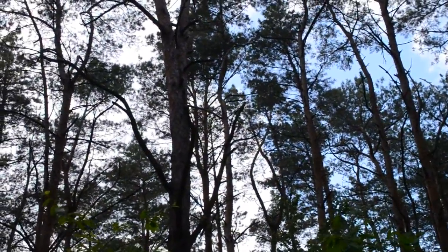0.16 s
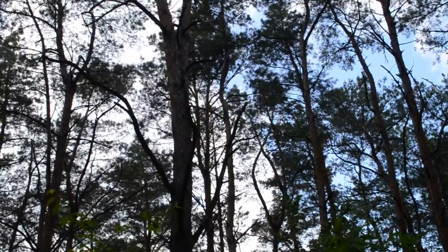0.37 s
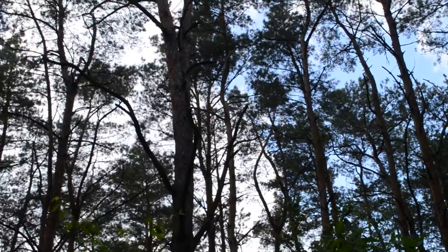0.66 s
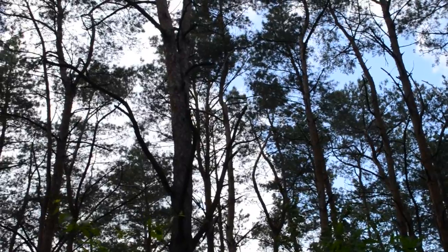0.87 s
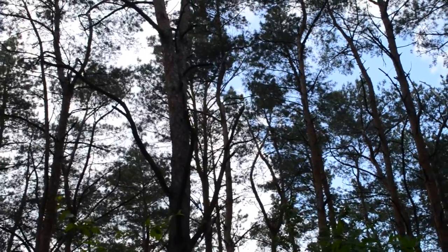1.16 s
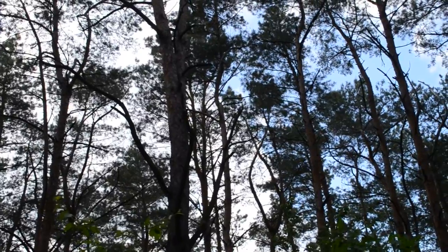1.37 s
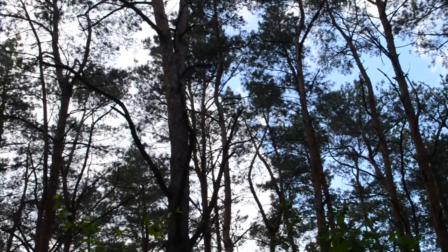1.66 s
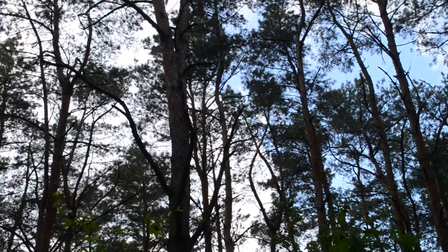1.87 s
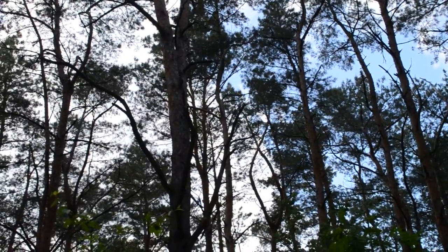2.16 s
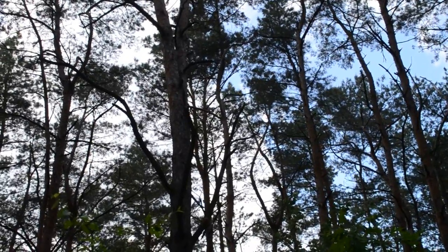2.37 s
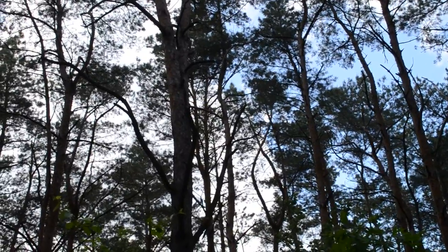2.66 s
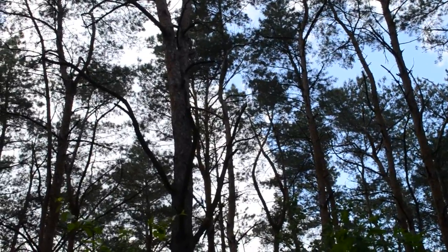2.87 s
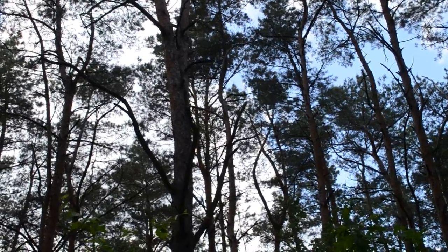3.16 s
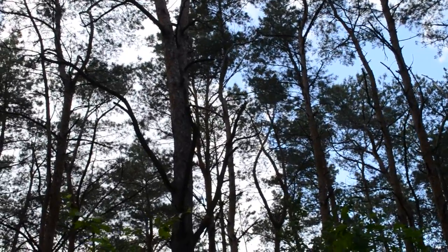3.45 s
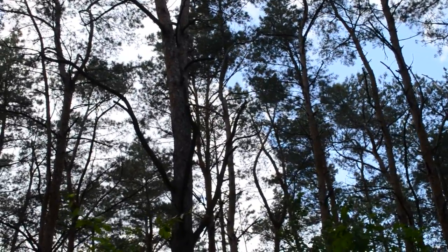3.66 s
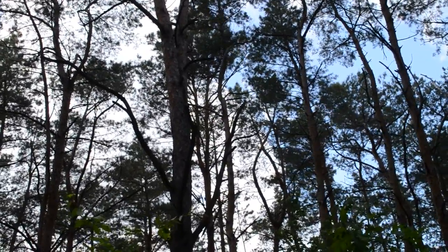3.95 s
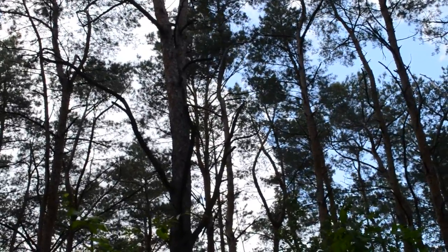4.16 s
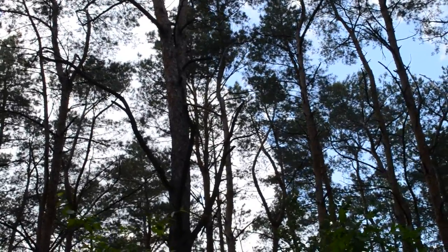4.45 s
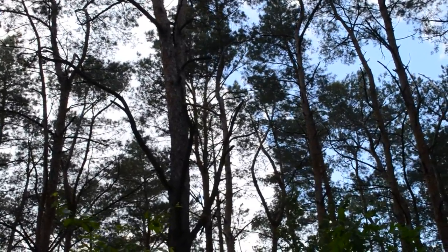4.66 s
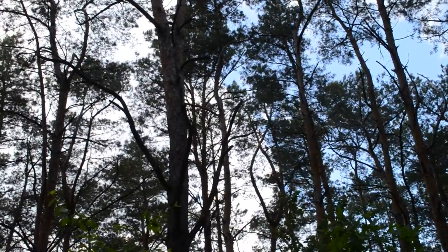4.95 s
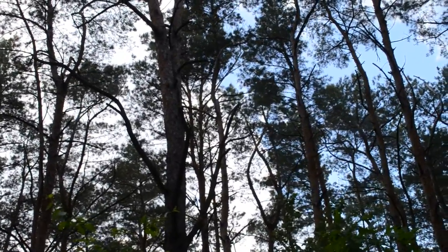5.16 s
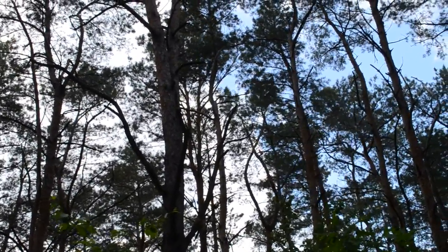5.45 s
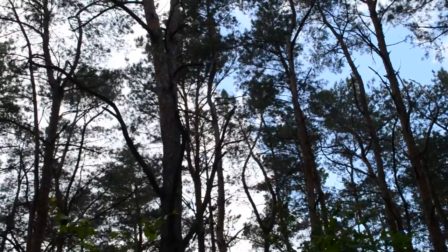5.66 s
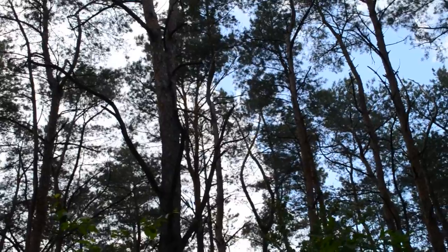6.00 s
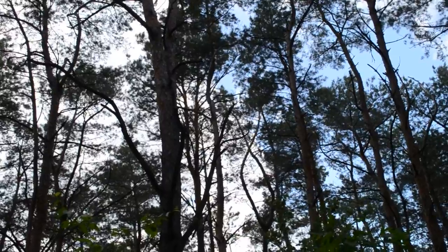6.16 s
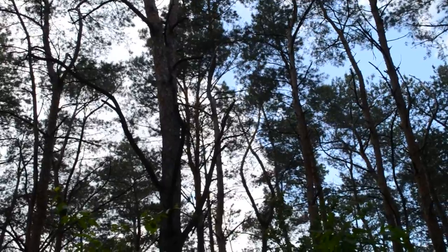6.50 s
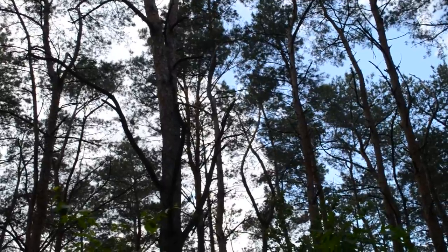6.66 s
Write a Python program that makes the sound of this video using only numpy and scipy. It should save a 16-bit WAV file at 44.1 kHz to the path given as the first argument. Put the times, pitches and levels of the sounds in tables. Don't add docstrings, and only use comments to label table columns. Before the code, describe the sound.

A calm pine forest, captured in mono outdoors. Throughout lies a quiet, soft hiss of wind in the crowns and distant traffic, swelling slightly after 2 s, with an almost inaudible thin band of far insects. From about 1 to 5 s, faint birds peep far off, some high, mostly lower and mellow. At 3.4 s a close warbler begins: thin, bright, very short chirps sweeping steeply upward, first softer and about 0.2 s apart, then louder and closer, eleven in all until 4.9 s. At 5.0 s they turn into a fast, even trill, about sixteen notes a second, softening slightly before ending near 6.4 s. A small dry twig snap ticks at 5.0 s. From 5.7 to 6.7 s a more distant thrush gives lower, clear sliding whistles and a brief fast warble. Trunks lend a short, airy echo; the quiet hush remains until 6.8 s.

```python
import sys
import numpy as np
from scipy import signal
from scipy.fft import rfft, irfft, next_fast_len
from scipy.io import wavfile
from scipy.ndimage import uniform_filter1d

SR = 44100
rng = np.random.default_rng(int(sys.argv[2]) if len(sys.argv) > 2 else 0)


def linear_from_db(decibels):
    return 10 ** (np.asarray(decibels, float) / 20)


def pcm_store(signal):
    levels = np.round(np.clip(np.atleast_2d(signal), -1, 1) * 32767)
    wavfile.write(sys.argv[1], SR, levels.astype(np.int16).T)


N = 301203
KNEE_HZ = 5500


def at_hz(points, hz, column=1):
    table = np.array(points)
    return np.interp(np.log(hz), np.log(table[:, 0]), table[:, column])


def rms_one(x):
    return x / np.sqrt(np.mean(x ** 2) + 1e-20)


def drift(rate):
    r = np.exp(-80 * np.pi * rate / SR)
    slow = signal.lfilter([1], [1, -2 * r, r * r], rng.standard_normal(N // 40 + 2002))[2000:]
    return np.interp(np.arange(N) / 40, np.arange(len(slow)), rms_one(slow))


def add(out, rows, overtones=None, throat_db=0, round_s=0.0028):
    s, hz, db = np.array(sorted(rows)).T
    at = np.arange(int(s[0] * SR), min(int(s[-1] * SR), N))
    size = max(int(round_s * SR), 1)
    pitch = uniform_filter1d(np.interp(at / SR, s, hz), size, mode="nearest")
    level = uniform_filter1d(np.interp(at / SR, s, db), size, mode="nearest")
    phase = 2 * np.pi * np.cumsum(pitch) / SR
    wave = np.sin(phase)
    if overtones:
        second = linear_from_db(throat_db + at_hz(overtones, pitch))
        third = linear_from_db(throat_db + at_hz(overtones, pitch, column=2))
        wave += second * np.sin(2 * phase)
        wave += third * np.sin(3 * phase) * (3 * pitch < .45 * SR)
    fade = np.clip(np.minimum(at - at[0], at[-1] - at) / size, 0, 1)
    out[at] += linear_from_db(level) * fade * wave


def shifted(shape, s, hz_scale, db, stretch=1, depth=1):
    return [(s + stretch * ms / 1000, hz_scale * hz, db + depth * under) for ms, hz, under in shape]


def climb(shape, s, ms, top_hz, db, early_db):
    return [(s + at * ms / 1000, KNEE_HZ + up * (top_hz - KNEE_HZ), db + under + early_db * (1 - at))
            for at, up, under in shape]


# time in ms, share of the climb, level in dB under the peak.
CHIRP_BEND = [(0.0, 0.0, -3.5), (3, .24, -4.5), (8, 0.51, -1)]
# share of the time left, level in dB under the peak.
CHIRP_CLIMB = [(.3, 2.5), (.7, .5), (1.0, -3)]


def bent(ms):
    bend_ms, bend, _ = CHIRP_BEND[-1]
    start = [(at / ms, up, db) for at, up, db in CHIRP_BEND]
    rest = [((bend_ms + at * (ms - bend_ms)) / ms, bend + at * (1 - bend), db) for at, db in CHIRP_CLIMB]
    return start + rest


# time in ms, share of the start pitch, level in dB.
FLICK = [(-2, 1.005, -25), (0, 1, -3), (2, .975, 0), (5.5, .88, -4), (8.5, .8, -14), (18, .5, -18),
         (20, .45, -40)]


def flick(out, s, ms, top_hz):
    db = -48.5 - 3.5 * max(30.3 - ms, 0)
    start_hz = 3530 + .75 * top_hz
    add(out, shifted(FLICK, s + .0315, start_hz, db), round_s=.0015)


# time of the knee in seconds, ms to the top, top in Hz, peak in dB.
CHIRPS = [(3.432, 30, 9020, -35.5), (3.6246, 28.4, 8540, -36), (3.787, 29.6, 8370, -35),
          (3.941, 29.7, 8060, -31), (4.0904, 29.8, 7900, -30), (4.235, 36.6, 7890, -32),
          (4.3762, 29.6, 7790, -30), (4.5076, 28, 7730, -30.5), (4.6397, 30, 7800, -28),
          (4.7729, 27.7, 7600, -26), (4.8862, 25, 7550, -27.5)]
# time in ms, share of the way from foot to knee, level in dB under the peak.
CHIRP_RUN_UP = [(-21, .02, -48), (-17, 0.031, -31), (-13, .14, -30.5), (-8, .3, -20), (-6.5, 0.52, -15),
                (-2, .64, -12), (-2, .78, -6)]
# time in ms, share of the top pitch, level in dB under the peak.
CHIRP_DROP = [(3.5, .99, -5.5), (7, .935, -13), (11, .87, -32)]
# pitch in Hz, second overtone in dB, third in dB.
OVERTONES = [(1900, 9, -30), (2200, 10, -25), (2700, 6, -20), (3270, -1, -17), (4200, -11, -34),
             (5070, -18, -52), (6230, -46, -64)]


def chirps(out):
    for s, ms, top_hz, db in CHIRPS:
        cold = np.exp((CHIRPS[0][0] - s) / .35)
        stretch, depth = 1 + cold * (0.44 - 1), 1 + cold * (0.28 - 1)
        foot_hz, early_db = 1950 + cold * (3010 - 1950), cold * -10.5
        lead = shifted(CHIRP_RUN_UP, s, KNEE_HZ - foot_hz, db + early_db, stretch, depth)
        run_up = [(t, foot_hz + hz, level) for t, hz, level in lead]
        body = climb(bent(ms), s, ms, top_hz, db, early_db)
        fall = shifted(CHIRP_DROP, s + ms / 1000, top_hz, db)
        add(out, run_up + body + fall, OVERTONES, 9.1 * (depth - 1))
        flick(out, s, ms, top_hz)


# time of the knee in seconds, ms to the top, top in Hz, peak in dB, run-up stretch.
TRILL = [(4.9655, 16, 7380, -28, .8), (5.0276, 14, 7450, -26.5, .9), (5.0875, 16, 7440, -26.5, 1.0),
         (5.1488, 16, 7330, -26, 0.78), (5.2099, 16, 7310, -25.5, .9), (5.2714, 16, 7340, -26.5, 1.0),
         (5.333, 13, 7460, -26, 1), (5.393, 16, 7500, -26.5, 1.05), (5.4561, 15.5, 7420, -26.5, 1.2),
         (5.5185, 15.5, 7240, -27, 1.7), (5.5802, 16, 7270, -28, 1.7), (5.6404, 18.7, 7160, -28.5, 1.4),
         (5.703, 19, 7330, -26, 1.2), (5.7669, 13, 7140, -26, 1.4), (5.8271, 15.5, 7290, -26.5, 1.2),
         (5.89, 14, 7290, -27, 1.5), (5.9534, 15, 7350, -27, 1.3), (6.016, 13, 7310, -26.5, 1.4),
         (6.0804, 14, 7350, -25.5, 1.3), (6.145, 14, 7270, -27.5, 1.4), (6.2112, 13, 7140, -29, 1.7),
         (6.2751, 13, 7190, -29.5, 1.7), (6.3393, 17, 7090, -29.5, 1.6)]
# time in ms, pitch in Hz, level in dB under the early peak.
TRILL_RUN_UP = [(-16, 3480, -39.5), (-12, 3800, -22), (-8, 4250, -9.5), (-5, 4650, -7), (-3, 5160, 0.5)]
# share of the time, share of the climb, level in dB under the peak.
TRILL_CLIMB = [(0.0, 0.0, -0.33), (.35, 0.47, -0.16), (.75, .83, 0.97), (1.0, 1.0, -1)]
FIRST_CLIMB = [(0.0, 0.13, -2.5), (.25, .43, 0.33), (.55, .68, 1.2), (1.0, 1.0, 1.2)]
# time in ms, share of the top pitch, level in dB under the late peak.
TRILL_DROP = [(2.5, 1, -4.5), (5, 0.92, -8), (8, .9, -8), (11, .85, -31)]
# pitch in Hz, second overtone in dB, third in dB.
TRILL_OVERTONES = [(3600, -21, -76), (4260, -22.5, -61.5), (4760, -30.5, -61), (5950, -59.5, -60)]


def trill(out):
    break_ms = -5
    for s, ms, top_hz, db, stretch in TRILL:
        tired = (s - TRILL[0][0]) / (TRILL[-1][0] - TRILL[0][0])
        depth = 1.27 + tired * (.8 - 1.27)
        early_db = -3 + tired * (4 - -3)
        late_peak_db = db - early_db / 2
        lead = [(at + (stretch - 1) * min(at - break_ms, 0), hz, under) for at, hz, under in TRILL_RUN_UP]
        run_up = shifted(lead, s, 0.99, db + early_db / 2, depth=depth if tired else 1.1)
        body = climb(TRILL_CLIMB if tired else FIRST_CLIMB, s, ms, top_hz, late_peak_db, early_db)
        fall = shifted(TRILL_DROP, s + ms / 1000, top_hz, late_peak_db)
        throat_db = 8 * (depth - 1) + rng.normal(0, 2.5)
        add(out, run_up + body + fall, TRILL_OVERTONES, throat_db)


def warbler():
    out = np.zeros(N)
    chirps(out)
    trill(out)
    return out * linear_from_db(0.5 + 0.96 * drift(160))


# start in seconds, peak in dB.
SNAP = [
    (5.0353, -42.5),
]
# pitch in Hz, level in dB, seconds to fade by 60 dB.
SNAP_MODES = [(1416, 1.5, .03), (1950, -2, .022), (2450, -4, .02), (2950, -1.5, .02), (3350, -3, .018)]


def twig():
    out, t = np.zeros(N), np.arange(2000) / SR
    for s, db in SNAP:
        ring = sum(linear_from_db(d - 60 * t / t60) * np.sin(2 * np.pi * hz * t) for hz, d, t60 in SNAP_MODES)
        start = int(s * SR)
        out[start:start + len(t)] += linear_from_db(db) * ring * (1 - np.exp(-t / 0.0015))
    return out


# pitch in Hz, seconds to fade by 60 dB, scatter level in dB.
FOREST = [(1500, 0.93, 4.5), (3000, 0.74, 5.5), (4580, 0.55, 5.5), (5900, 0.53, 4.5), (7710, 0.55, 2.7),
          (9090, 0.46, 4.5), (10500, 0.29, 0.2)]


def scatter(onset_s, near_db, stretch):
    t = np.arange(SR) / SR
    edges, tail = 1000 * 2 ** np.arange(0, 3.7, 1 / 3), 0
    echoes = rng.standard_normal(SR) * linear_from_db(3 * rng.standard_normal(SR))
    for low, high in zip(edges, edges[1:]):
        band = signal.sosfilt(signal.butter(2, [low, high], "band", fs=SR, output="sos"), echoes)
        middle_hz = np.sqrt(low * high)
        t60 = stretch * at_hz(FOREST, middle_hz)
        band = band * linear_from_db(at_hz(FOREST, middle_hz, column=2))
        tail = tail + band * (linear_from_db(-60 * t / t60) + linear_from_db(near_db - 60 * t / 0.11))
    tail = tail * (1 - np.exp(-t / onset_s))
    return tail / np.sqrt(np.sum(tail ** 2))


def forest(x, onset_s, near_db, stretch):
    aims = np.array([linear_from_db(6 * drift(2.5)) for _ in range(3)])
    aims = aims / np.sqrt(np.sum(aims ** 2, axis=0))
    return sum(signal.fftconvolve(x * aim, scatter(onset_s, near_db, stretch))[:N] for aim in aims)


# share of its length, share of the pitch change, level in dB under the peak.
SLIDE = [(0.0, 0.0, -6), (.4, .5, 0.0), (.8, .88, -1.5), (1.0, 1.0, -6)]


def slides(rows):
    return [[(s + at * length, hz + up * (end_hz - hz), db + under) for at, up, under in SLIDE]
            for s, length, hz, end_hz, db in rows]


def whistles(notes, flutter_db):
    out = np.zeros(N)
    for rows in notes:
        add(out, rows, round_s=0.0022)
    return np.sqrt(2) * out * linear_from_db(flutter_db * drift(70))


# time in seconds, pitch in Hz, level in dB.
THRUSH_RISE = [(6.075, 1545, -58), (6.085, 1687, -50.5), (6.1, 1830, -52), (6.15, 1884, -48.5),
               (6.173, 1938, -40), (6.21, 1950, -42.5), (6.228, 2080, -52)]
THRUSH_FALL = [(6.41, 2680, -62.5), (6.431, 2527, -46), (6.454, 2425, -53), (6.499, 2410, -44.5),
               (6.532, 2297, -41.5), (6.57, 2268, -56.5), (6.615, 2284, -53)]
# start in seconds, length in seconds, start in Hz, end in Hz, peak in dB.
THRUSH = [
    (5.706, 0.05, 1835, 2040, -49.5),
    (5.77, .02, 2500, 2640, -56),
    (5.79, .03, 2620, 2510, -51.5),
    (6.036, 0.021, 2450, 2050, -47.5),
    (6.627, .026, 2280, 1854, -45.5),
    (6.655, 0.0096, 1840, 1540, -44),
    (6.612, 0.02, 2920, 2430, -57),
    (6.652, .03, 2450, 1890, -56),
]
# time in seconds, lowest pitch in Hz, peak in dB.
BURR = [(5.819, 1922, -48.5), (5.842, 1900, -47.5), (5.861, 1956, -49), (5.882, 1876, -47.5),
        (5.899, 1892, -45.5), (5.919, 1928, -46)]
# time in ms, share of the lowest pitch, level in dB.
DIP = [(-13.5, 1.144, -29), (-9.5, 1.2, -4), (-3, 1.01, 2), (4, 0.96, 6.5), (2.5, 1.05, 4.5),
       (6.5, 1.1, -1), (12, 1.3, -39)]


def thrush():
    burr = np.zeros(N)
    for s, hz, db in BURR:
        add(burr, shifted(DIP, s, hz, db), round_s=.0015)
    return whistles([THRUSH_RISE, THRUSH_FALL] + slides(THRUSH), flutter_db=1.0) + burr


# start in seconds, length in seconds, start in Hz, end in Hz, peak in dB.
FAR_LOW = [(1.66, .07, 1710, 1760, -66), (1.99, .07, 1900, 1870, -70), (1.83, .075, 2090, 1860, -65),
           (1.89, .09, 1860, 2020, -67), (2.095, .09, 2170, 2090, -65), (2.23, .07, 2110, 2100, -64),
           (2.31, .06, 2120, 2070, -67), (3.41, .03, 2130, 2020, -67), (3.66, .08, 2110, 2060, -68),
           (3.915, .04, 2100, 2110, -65), (4.085, .08, 1805, 1805, -62), (4.2, .06, 2080, 2020, -70),
           (4.3, .07, 2100, 1950, -66.5), (4.64, .05, 2150, 2030, -68)]
FAR_MID = [(3.75, .08, 2200, 2330, -69), (3.83, .09, 2330, 2270, -70), (3.95, .09, 2660, 2690, -71),
           (3.98, .1, 2230, 2250, -70), (4.53, .08, 2430, 2510, -64.5), (4.62, .08, 2520, 2490, -66),
           (4.66, .1, 2400, 2150, -68), (4.76, .04, 2400, 2450, -70)]
FAR_HIGH = [(1.055, .07, 4150, 4140, -67), (1.26, .11, 4250, 4290, -76), (1.48, .07, 4260, 4240, -78),
            (1.53, .07, 3540, 3510, -78), (1.83, .11, 4230, 4290, -75), (2.96, .05, 4200, 4180, -73),
            (3.24, .04, 4300, 4520, -74), (3.28, .06, 4520, 4250, -73)]


def far_birds():
    return whistles(slides(FAR_LOW + FAR_MID + FAR_HIGH), flutter_db=2.5)


def hiss(spectrum, low_hz, high_hz, patchy_db):
    size = next_fast_len(N)
    hz = np.maximum(np.arange(size // 2 + 1) * SR / size, 1)
    colour = linear_from_db(at_hz(spectrum, hz))
    inside = np.sum(colour[(hz > low_hz) & (hz < high_hz)] ** 2)
    noise = irfft(rfft(rng.standard_normal(size)) * colour, size)[:N]
    return noise * np.sqrt(size / 2 / inside) * linear_from_db(patchy_db * drift(3))


# pitch in Hz, level in dB per Hz.
HISS_LOW = [(12, -63.5), (20, -31.5), (54, -16), (162, -13), (313, -4.5), (404, -3), (573, 0), (1280, -4.5),
            (1600, -10.5), (2080, -26), (3520, -120)]
HISS_HIGH = [(940, -40.5), (1600, -2), (2020, 0), (2300, -3), (3080, -4.5), (4090, -7.5), (4430, -6.5),
             (5130, -12.5), (5880, -14), (7800, -20), (8950, -19.5), (11000, -26), (14400, -68.5),
             (22000, -120)]
# time in seconds, level in dB.
SWELL = [(0.0, -60), (0.64, -60), (1.0, -59), (2.0, -59), (2.4, -57.5), (4.5, -57.5), (6.83, -58)]


def wind():
    t = np.arange(N) / SR
    low = hiss(HISS_LOW, low_hz=200, high_hz=1600, patchy_db=0.07)
    high = hiss(HISS_HIGH, low_hz=2714, high_hz=3670, patchy_db=0.5)
    high = linear_from_db(-15 + 0.22 * t) * high
    return linear_from_db(np.interp(t, *np.transpose(SWELL))) * (low + high)


# pitch in Hz, width in Hz, level in dB.
INSECTS = [(4350, 84, -81.5), (4550, 63, -87.5)]


def insects():
    out = 0
    for hz, width, db in INSECTS:
        edges = [hz - width / 2, hz + width / 2]
        band = signal.sosfilt(signal.butter(2, edges, "band", fs=SR, output="sos"), rng.standard_normal(N))
        out = out + linear_from_db(db + 2 * drift(4.8)) * rms_one(band)
    return out


def scene():
    near = warbler() + twig()
    far = thrush()
    peeps = far_birds()
    near = near + linear_from_db(-9.0) * forest(near, onset_s=0.0045, near_db=7.5, stretch=0.96)
    far = linear_from_db(-5) * far + linear_from_db(-8.5) * forest(far, onset_s=.005, near_db=8, stretch=0.96)
    peeps = linear_from_db(-1.5) * peeps + linear_from_db(-8) * forest(peeps, onset_s=.02, near_db=-10, stretch=.7)
    return (near + far + peeps + wind() + insects())[None]


def low_pass(x):
    return signal.sosfilt(signal.butter(12, 11200, fs=SR, output="sos"), x)


def record(dry):
    notch_hz, width_hz, depth = 7930, 150, 0.87
    band = signal.lfilter(*signal.iirpeak(notch_hz, notch_hz / width_hz, fs=SR), dry)
    dull = signal.sosfilt(signal.butter(10, 10480, fs=SR, output="sos"), dry - depth * band)
    return low_pass(dull)


dry = scene()
out = record(dry)
pcm_store(out)
```